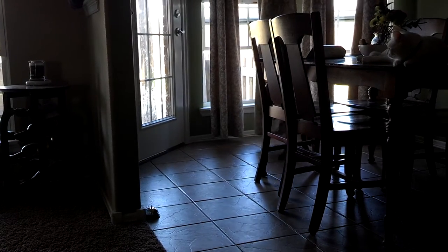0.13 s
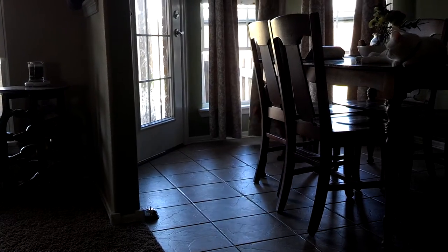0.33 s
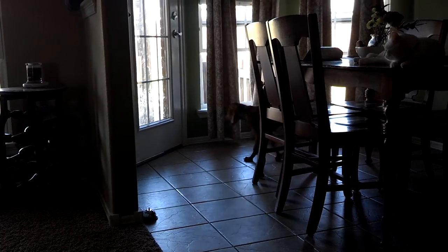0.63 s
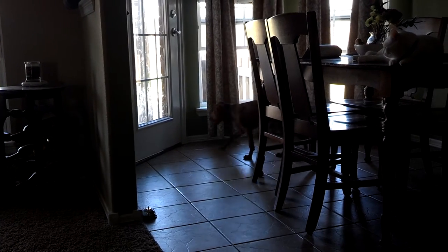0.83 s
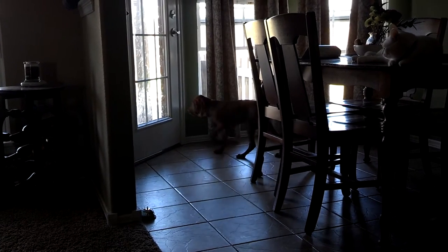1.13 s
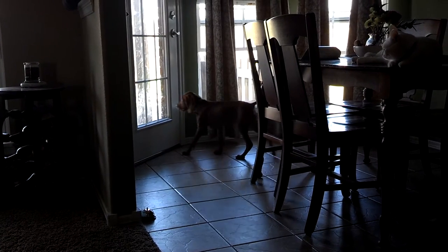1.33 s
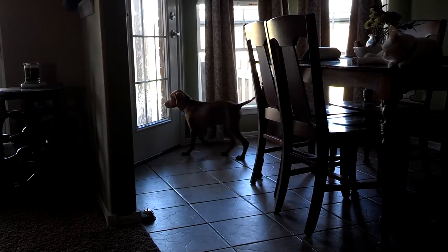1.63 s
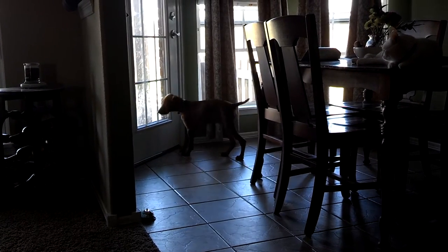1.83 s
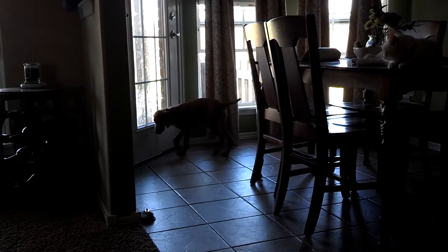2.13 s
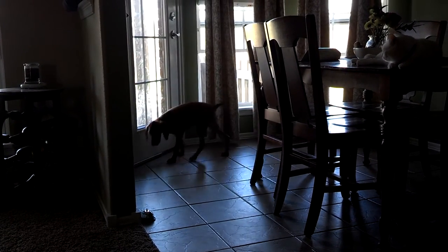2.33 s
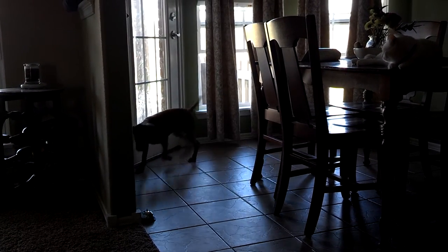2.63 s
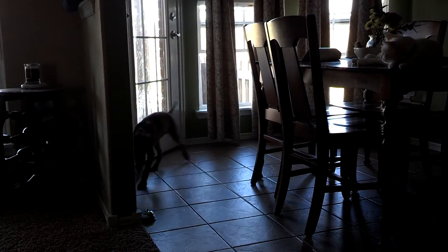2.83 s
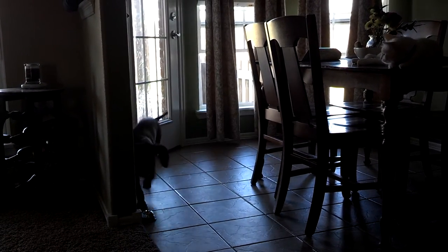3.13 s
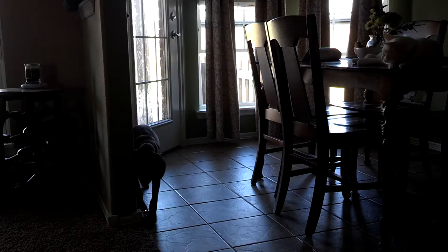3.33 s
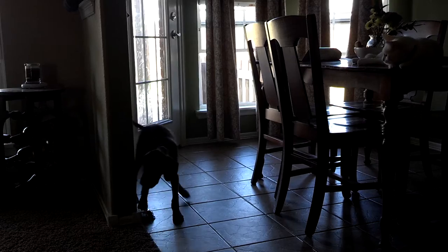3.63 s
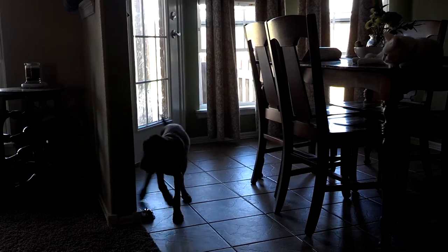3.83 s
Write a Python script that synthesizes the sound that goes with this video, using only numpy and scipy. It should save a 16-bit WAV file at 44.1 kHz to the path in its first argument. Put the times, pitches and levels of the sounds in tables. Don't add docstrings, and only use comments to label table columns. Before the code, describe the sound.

Small bells jingle as a dog nudges them at a door; before that, soft paw bumps on tile, afterwards a short snort and a last bright jingle. Quiet room, faint hum and thin motor whine from the camera.

```python
import sys
import numpy as np
from scipy import signal
from scipy.fft import rfft, irfft, next_fast_len
from scipy.io import wavfile

SR = 44100
rng = np.random.default_rng(int(sys.argv[2]) if len(sys.argv) > 2 else 0)


def invert_db(level):
    return 10 ** (np.asarray(level, dtype=float) / 20)


def waveform_to_disk(signal):
    frames = np.transpose(np.atleast_2d(signal))
    scaled = np.clip(frames, -1, 1) * 32767
    samples = np.round(scaled).astype(np.int16)
    wavfile.write(sys.argv[1], SR, samples)


N = 176400
T = np.arange(N) / SR

# (time [s], level [dB])
MOTOR_LEVEL = [(0, 1), (0.599, -1.5), (1.2, -2.5), (1.5, -4.5), (1.901, -3.5), (2.2, -1.5), (2.7, -2),
               (3.05, -3.5), (3.15, -6.5), (4, -12)]
# (time [s], rate [Hz])
TOOTH_RATE = [(0, 203.75), (.5, 203.6), (1.3, 203.6), (1.75, 203.8), (2.25, 204.27), (2.75, 204.7),
              (3.05, 204.4), (4, 204.6)]
TOOTH_EARLY_DB = [-83, -72.5, -76, -70.5, -82, -68, -78, -65.5, -63, -62.5, -59, -91, -65, -70, -64, -77,
                  -76, -62.5, -68.5, -69, -64, -68, -68, -74, -68, -77.5, -84]
TOOTH_LATE_DB = [-84, -69, -76.5, -69.5, -91, -70.5, -73.5, -70, -72, -56.5, -65.5, -67, -67.5, -63, -67.5,
                 -71, -65, -64, -62.5, -64, -63.5, -86, -73, -70.5, -71, -87.5, -87]
# (frequency [Hz], density [dB per Hz])
BRUSH_HISS = [(3000, -15.5), (4200, -10), (5800, -5.5), (7800, -0.5), (8600, -8), (9300, -24), (10500, -61)]
# (frequency [Hz], density [dB per Hz])
AIR_COLOUR = [(35, -32), (70, -5.5), (120, 0.5), (400, -2), (1200, -14.5), (3000, -21.5), (10000, -27),
              (15500, -26)]
# (time [s], level [dB])
AIR_LEVEL = [(0, -57.5), (.8, -55), (1.3, -58), (1.9, -59), (2.3, -56.5), (3.2, -56.5), (3.6, -55.5),
             (4, -59)]
# (centre [Hz], width [Hz], level [dB])
HUM_LINES = [(128.7, 9, -68), (215.4, 6.9, -71.5), (235.2, 6.4, -72), (324, 2.6, -71.5), (356, 8.1, -78)]
# (centre [s], half length [s], level [dB], centre [Hz], width [Hz])
RUBS = [(0.152, .03, -66, 8900, 14000), (0.33, 0.048, -64, 1190, 860), (0.708, 0.028, -63, 8950, 19000),
        (0.767, 0.077, -57, 2220, 1660), (1.057, 0.046, -60, 1250, 130), (1.121, 0.029, -60.5, 7800, 16000),
        (3.11, 0.024, -50.5, 7170, 2000), (1.126, 0.022, -61.5, 3280, 1200), (3.898, 0.061, -52.5, 105, 62),
        (0.66, 0.032, -62, 1230, 960), (3.575, 0.091, -57, 358, 23)]
# (time [s], level [dB], brightness [Hz], ring share [ratio])
BUMPS = [
    (.28, -45.5, 910, 1.8),
    (0.472, -40, 446, 0.55),
    (.577, -45, 900, 0.42),
    (0.7402, -30, 1390, 0.92),
    (0.761, -35, 1600, 0.55),
    (0.787, -36, 795, 1.37),
    (3.064, -45, 900, 0.86),
    (3.946, -41.5, 1500, 0.17),
]
# (frequency [Hz], level [dB], t60 [s])
FLOOR_MODES = [(212, -27, 0.041), (395, -8, 0.089), (827, 0, 0.038), (977, 4, 0.027), (1076, -1.5, 0.035),
               (1526, -1.5, 0.031), (2800, 5, .015)]
# (frequency [Hz], level [dB], t60 [s])
BELL_ONE_MODES = [(4156, -6, 0.25), (4549, 3, 0.16), (4490, -5, .1), (4630, -2, 0.18), (9110, -1, 0.14),
                  (9180, 2, 0.15), (9340, -5, .08), (11950, -9, .2), (12550, 3, 0.3), (12600, -5, 0.3),
                  (14300, 1.5, 0.2), (14390, -6, .15)]
BELL_TWO_MODES = [(4156, 0, 0.35), (4175, -9, .3), (4592, -7, 0.25), (4650, -11, .2), (9044, 0, 0.15),
                  (9090, -7, .17), (11919, -2, 0.22), (11952, 2, 0.22), (12535, -6, 0.3), (12590, 0, 0.36),
                  (14290, -5, 0.18), (14340, 0, .2), (14410, -8, 0.2)]
BELL_THREE_MODES = [(4156, 0, 0.55), (4635, 0, .15), (9060, 0, 0.2), (9108, -8, 0.12), (11950, 0, .07),
                    (12570, 4, 0.25), (12600, -10, .2), (14330, 8, .1), (14347, 0, .16), (14600, -10, .1)]
# (time [s], 4.2 kHz group [dB], 4.6-9 kHz [dB], 12 kHz [dB], 14 kHz [dB])
BELL_ONE_STRIKES = [
    (2.651, -51, -49, -48, -47),
    (2.655, -53, -48, -51, -45),
    (2.685, -67, -62, -58, -58),
]
BELL_TWO_STRIKES = [
    (2.837, -62, -56.5, -53.5, -72),
    (2.845, -51, -65, -56, -76),
    (3.089, -54, -43, -36, -30),
    (3.095, -46.5, -47, -42, -45),
    (3.109, -58, -40, -44, -48),
    (3.126, -60, -64, -47, -49),
    (3.140, -49, -53, -54, -58),
    (3.163, -67.5, -52, -62, -48),
]
BELL_THREE_STRIKES = [
    (3.927, -52.5, -48, -39.5, -35),
    (3.965, -63.5, -59.5, -56, -48),
    (3.991, -60, -64, -60, -50),
]
GROUP_EDGES_HZ = (4400, 10500, 13500)
# (time [s], level [dB])
SNORT_EFFORT = [
    (3.303, -83),
    (3.311, -47.5),
    (3.366, -46.5),
    (3.371, -41.5),
    (3.39, -37),
    (3.45, -43),
    (3.52, -51),
    (3.62, -60.5),
]
# (frequency [Hz], width [Hz], level [dB])
NOSE = [(738, 193, -5.5), (1250, 125, 2.5), (1690, 300, -4.5), (2233, 350, -5), (3137, 280, -3.5),
        (4270, 450, -2), (6430, 147, -0.5), (9080, 320, -2.5), (11470, 340, -12.5), (13100, 380, -7),
        (15300, 230, -5.5)]
FAR_PORT_DB = {"bell": -36, "snort": -1.5, "floor": 0.5, "tone": 2.5, "motor": -4, "room": -5.5}
# (frequency [Hz], margin [dB])
KEEP_WITHIN = [(600, 30), (1400, 14), (2750, 6.5), (4100, 9), (5500, 11.5), (6900, 12), (8300, 12),
               (9700, 7), (11000, 4.5), (15500, 4.5)]

FIRST_ORDER, SHAFT_DB, ORDER_WANDER_DB, BRUSH_HISS_DB = 19, -18.5, 3, -59.5
LOAD_SHIFTS_S = (1.8, 2.13)
DRONE_HZ, DRONE_DB, DRONE_WANDER_HZ = 215.7, -60, 2.46
BUMP_RISE_S = 0.0012
RISE_CYCLES, RESTRIKE_RISE_CYCLES = 3.5, 4.7
TICK_DB, TICK_S, RESTRIKE_TICK_DB = 12.5, 0.0016, -20
RATTLE_DB, RATTLE_PER_S, CALM_T60_S = 3.5, 75, 0.05
FIRST_DROP_T60_S, FIRST_SHARE = 0.07, 0.62
BELL_LAG = 1.6
NOSE_BREADTH_DB, NOSE_ROUGH_DB, NOSE_OPENS_S, NOSE_SHUT_DB = -15.5, 1.62, 3.37, -2.5
NOSE_DULLING = 0.62
ROOM_T60_S, ROOM_DB, WALL_CUT_HZ = 0.4, -5.5, 10500
MASK_SLOPE_DB = 9
TONE_STANDS_DB, TONE_BONUS_DB = 9.5, 14
WIDEN_LAG, WIDEN_FROM_HZ = 16, 566
PORT_NOISE_DB, PORT_NOISE_HZ = -61.5, 92
HIGH_PASS_HZ, CUTOFF_HZ = 38.7, 15750


def rms_one(x):
    return x / np.sqrt(np.mean(x ** 2) + 1e-20)


def drift(rate):
    r = np.exp(-80 * np.pi * rate / SR)
    slow = signal.lfilter([1], [1, -2 * r, r * r], rng.standard_normal(N // 40 + 2002))[2000:]
    return np.interp(np.arange(N) / 40, np.arange(len(slow)), rms_one(slow - slow.mean()))


def coloured(spectrum):
    hz, db = np.transpose(spectrum)
    f = np.arange(N // 2 + 1) * SR / N + 1
    gain = invert_db(np.interp(np.log(f), np.log(hz), db, left=-60, right=db[-1]))
    return rms_one(irfft(rfft(rng.standard_normal((2, N))) * gain, N))


def resonate(x, hz, width_hz):
    r = np.exp(-np.pi * width_hz / SR)
    top = np.array([1, 0, -1]) * (1 - r * r) / 2
    return signal.lfilter(top, [1, -2 * r * np.cos(2 * np.pi * hz / SR), r * r], x)


def decay(s, t60):
    return (T >= s) * invert_db(-60 * np.clip(T - s, 0, None) / t60)


def ports(near, far, name):
    return np.array([near, invert_db(FAR_PORT_DB[name]) * far])


def motor():
    level = invert_db(np.interp(T, *np.transpose(MOTOR_LEVEL)))
    shifted = np.interp(T, LOAD_SHIFTS_S, (0, 1))
    turn = 2 * np.pi * np.cumsum(np.interp(T, *np.transpose(TOOTH_RATE))) / SR
    whine = 0
    for k, (early_db, late_db) in enumerate(zip(TOOTH_EARLY_DB, TOOTH_LATE_DB)):
        phase = rng.uniform(0, 2 * np.pi, 4)
        shaft = 0
        for q in (1, 2):
            shaft = shaft + 2 * invert_db(SHAFT_DB + rng.normal(0, 3)) * np.sin(q * turn / 4 + phase[q])
        order_db = early_db + shifted * (late_db - early_db) + 3.5 + ORDER_WANDER_DB * drift(0.53)
        whine = whine + invert_db(order_db) * np.sin((FIRST_ORDER + k) * turn + phase[0]) * (1 + shaft)
    hiss = invert_db(BRUSH_HISS_DB) * coloured(BRUSH_HISS)
    return ports(whine * level + hiss[0] * level ** 0.32, hiss[1] * level ** 0.17, "motor")


def room_tone():
    bed = invert_db(np.interp(T, *np.transpose(AIR_LEVEL))) * coloured(AIR_COLOUR)
    for hz, width_hz, db in HUM_LINES:
        line = resonate(rng.standard_normal((2, N)), hz, width_hz)
        bed = bed + invert_db(db) * rms_one(resonate(line, hz, width_hz))
    turn = 2 * np.pi * np.cumsum(DRONE_HZ + DRONE_WANDER_HZ * drift(2.8)) / SR
    drone = invert_db(DRONE_DB + 1.85 * drift(0.93)) * np.sin(turn - np.array([[0], [1.2]]))
    return ports(*(bed + drone), "tone")


def rubs():
    out = np.zeros((2, N))
    for s, half, db, hz, width_hz in RUBS:
        swell = np.exp(-abs((T - s) / half) ** 3.6)
        band = resonate(rng.standard_normal((2, N)), hz, width_hz)
        out += invert_db(db) * swell * rms_one(resonate(band, hz, 2 * width_hz))
    return out


def bumps():
    out = np.zeros(N)
    for s, db, bright_hz, share in BUMPS:
        luck = rng.normal(0, 4.1, len(FLOOR_MODES))
        rise = 1 - decay(s, 7 * BUMP_RISE_S * share)
        for (hz, mode_db, t60), extra in zip(FLOOR_MODES, luck):
            level = invert_db(db + mode_db + extra - 9) / np.hypot(1, (hz / bright_hz) ** 2)
            out += level * rise * decay(s, t60 * share) * np.sin(2 * np.pi * hz * (T - s))
    return out


def bell(modes, strikes):
    out = np.zeros(N + SR)
    t = T[:SR // 2]
    last = began = 0
    unsteady = invert_db(RATTLE_DB * drift(RATTLE_PER_S))
    calm = decay(0, CALM_T60_S)[:len(t)]
    drop = 1 - FIRST_SHARE + FIRST_SHARE * decay(0, FIRST_DROP_T60_S)[:len(t)]
    for s, *group_db in strikes:
        start = int(s * SR)
        again = s - last < 0.07
        if not again:
            began = start
        last = s
        part = out[start:start + len(t)]
        cycles = RESTRIKE_RISE_CYCLES if again else RISE_CYCLES
        for hz, db, t60 in modes:
            level = invert_db(group_db[np.searchsorted(GROUP_EDGES_HZ, hz)] + db + 3)
            rise = 1 - np.exp(-t * hz / cycles)
            shake = calm + (1 - calm) * np.roll(unsteady, rng.integers(N))[:len(t)]
            tone = np.sin(2 * np.pi * hz * (t + (start - began) / SR))
            part += level * rise * drop * decay(0, t60)[:len(t)] * shake * tone
        click = np.diff(rng.standard_normal(len(t) + 1)) / 2
        part += invert_db(max(group_db) + TICK_DB + RESTRIKE_TICK_DB * again) * np.exp(-t / TICK_S) * click
    return out[:N]


def snort():
    effort_db = np.interp(T, *np.transpose(SNORT_EFFORT), left=-120, right=-120)
    fading_db = (effort_db - effort_db.max()) * (T > T[np.argmax(effort_db)])
    air = rng.standard_normal((2, N)) * invert_db(NOSE_ROUGH_DB * drift(120))
    ringing = 0
    for k, (hz, width_hz, db) in enumerate(NOSE):
        level = invert_db(db + NOSE_DULLING * fading_db * hz / 15000)
        ringing = ringing + (-1) ** k * level * resonate(air, hz, width_hz)
    ringing = ringing * invert_db(NOSE_SHUT_DB * (T < NOSE_OPENS_S))
    breath = invert_db(NOSE_BREADTH_DB + NOSE_DULLING * fading_db) * resonate(air, 4300, 10600)
    return invert_db(effort_db + 13) * (ringing + breath)


def room(x):
    size = next_fast_len(N + SR)
    bins = np.arange(size // 2 + 1)
    hz = bins * SR / size
    out = np.zeros((2, len(hz)), complex)
    for k, lag in enumerate((rng.uniform(.011, .037, 20) * SR).astype(int)):
        loss = invert_db(-60 * lag / SR / ROOM_T60_S * (3 + (hz / WALL_CUT_HZ) ** 2))
        loop = loss * np.exp(-2j * np.pi * hz * lag / SR)
        out[k % 2] += loop / (1 - loop) * (-1) ** (k // 2)
    return irfft(out * rfft(x, size), size)[:, :N]


def scene():
    steady = motor() + room_tone()
    brushes, knocks = rubs(), bumps()
    bells = bell(BELL_ONE_MODES, BELL_ONE_STRIKES) + bell(BELL_TWO_MODES, BELL_TWO_STRIKES)
    bells = bells + bell(BELL_THREE_MODES, BELL_THREE_STRIKES)
    lag = np.exp(-2j * np.pi * np.arange(N // 2 + 1) / N * BELL_LAG)
    late_bells = irfft(rfft(bells) * lag, N)
    nose = snort()
    wet = invert_db(ROOM_DB) * room(bells + knocks + 0.5 * nose[0])
    floor = ports(knocks, knocks, "floor") + ports(*brushes, "floor")
    direct = floor + ports(bells, late_bells, "bell") + ports(*nose, "snort")
    return steady + direct + ports(*wet, "room")


def thin_out(mid_side):
    frame = dict(nperseg=2048, noverlap=1024, window="cosine")
    pad = 1024 - 824
    spec = signal.stft(np.pad(mid_side, ((0, 0), (pad, 0))), **frame)[2]
    edges = np.r_[np.arange(0, 100, 8), np.arange(104, 144, 12), np.arange(144, 448, 16),
                  np.arange(448, 1025, 32)]
    width = np.diff(np.r_[edges, 1025])
    power = np.add.reduceat(abs(spec) ** 2, edges, axis=1) / width[:, None] + 1e-30
    apart = abs(edges[:, None] - edges) / width[:, None]
    spread = invert_db(-2 * MASK_SLOPE_DB * apart)[:, :, None]
    mask = np.max(power.sum(0)[None] * spread, axis=1)
    peak = np.maximum.reduceat(abs(spec) ** 2, edges, axis=1)
    tonal = peak > power * invert_db(2 * TONE_STANDS_DB)
    margin_db = np.interp((edges + width / 2) * SR / 2048, *np.transpose(KEEP_WITHIN))
    keep = power * invert_db(2 * TONE_BONUS_DB * tonal) > mask * invert_db(-2 * margin_db)[:, None]
    return signal.istft(spec * np.repeat(keep, width, axis=1), **frame)[1][:, pad:pad + N]


def band_limit(x):
    return signal.sosfilt(signal.butter(12, 16530, fs=SR, output="sos"), x)


def record(dry):
    hz = np.arange(N // 2 + 1) * SR / N + 1e-3
    late = np.exp(-2j * np.pi * hz * WIDEN_LAG / SR) / (1 + (WIDEN_FROM_HZ / hz) ** 6)
    left, right = rfft(dry)
    mid = (left + right) * (1 - late) / 2
    side = (left - right) * (1 + late) / 2
    rumble = coloured([(20, -12), (PORT_NOISE_HZ, 0), (300, -15), (600, -90)])[0]
    side = side + rfft(invert_db(PORT_NOISE_DB) * rumble)
    band = (hz < CUTOFF_HZ) / np.hypot(1, (HIGH_PASS_HZ / hz) ** 2)
    mid, side = thin_out(irfft(np.array([mid, side]) * band, N))
    return band_limit(np.array([mid + side, mid - side]))


dry = scene()
out = record(dry)
waveform_to_disk(out)
```